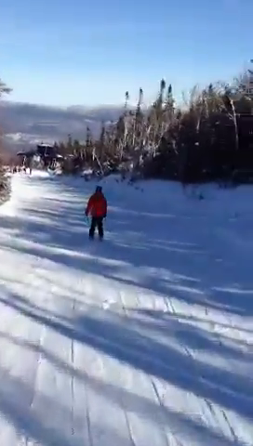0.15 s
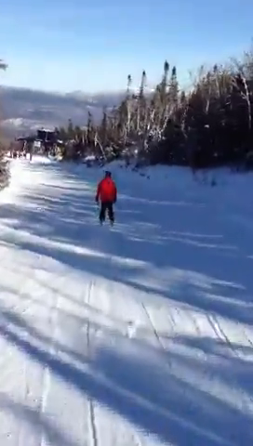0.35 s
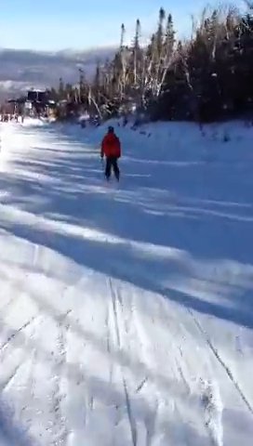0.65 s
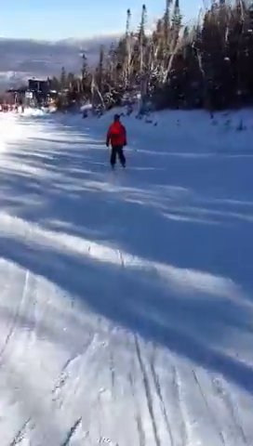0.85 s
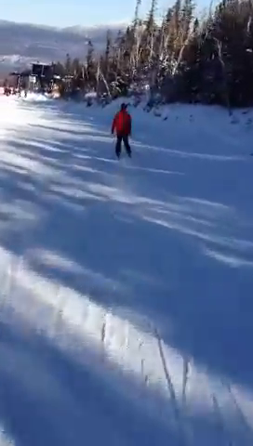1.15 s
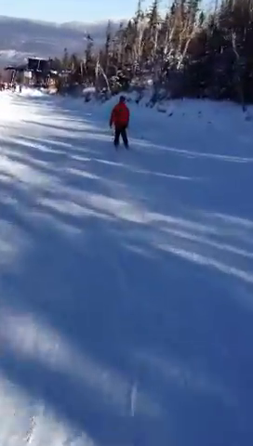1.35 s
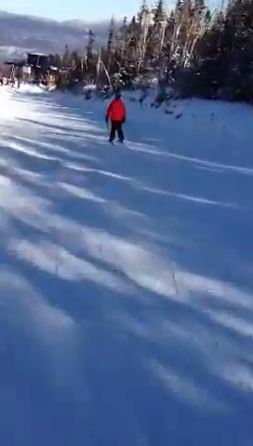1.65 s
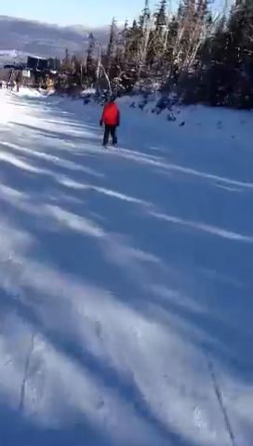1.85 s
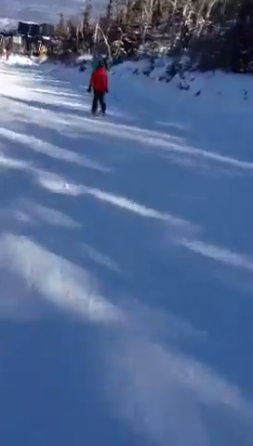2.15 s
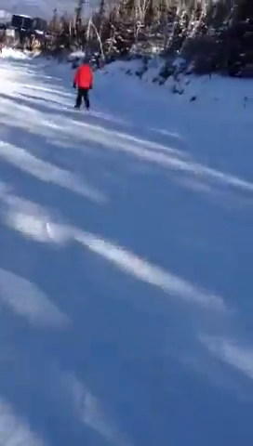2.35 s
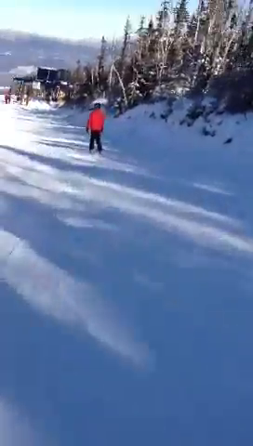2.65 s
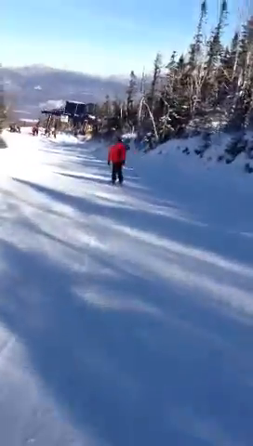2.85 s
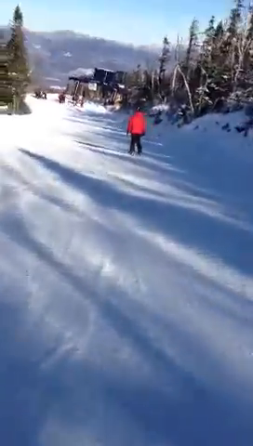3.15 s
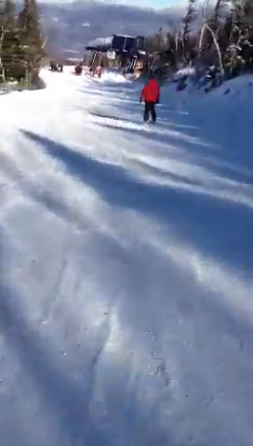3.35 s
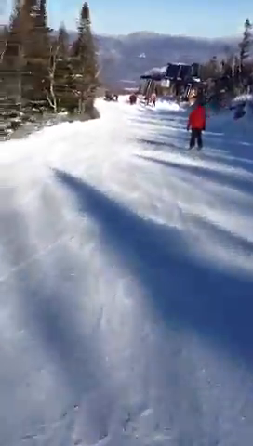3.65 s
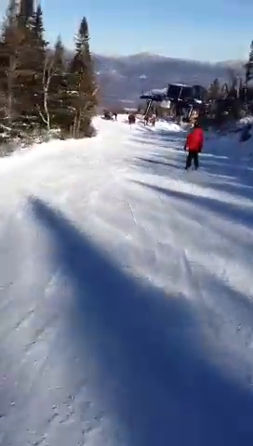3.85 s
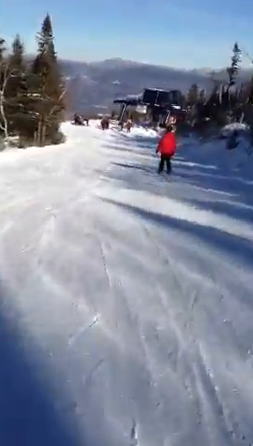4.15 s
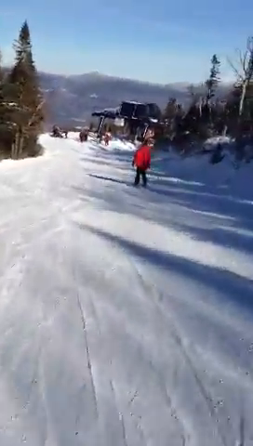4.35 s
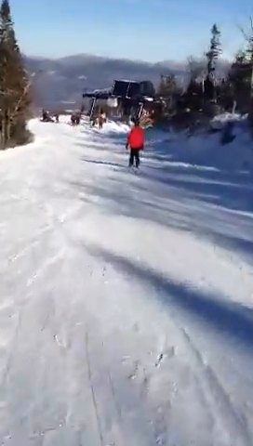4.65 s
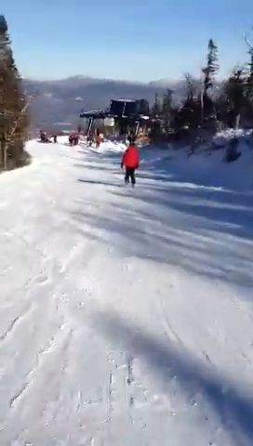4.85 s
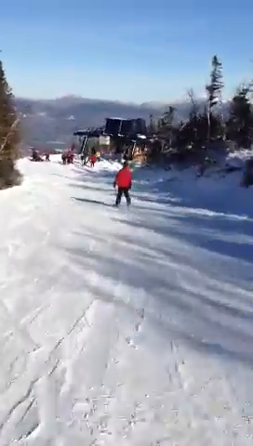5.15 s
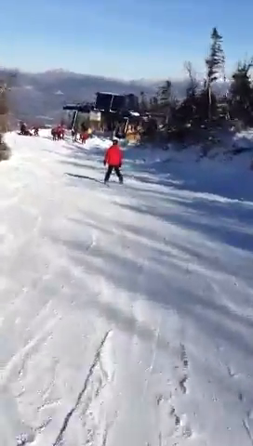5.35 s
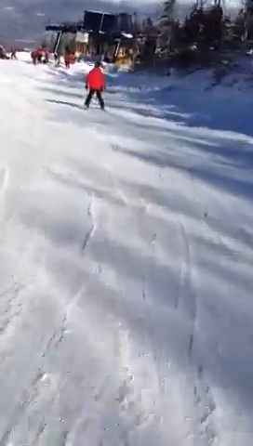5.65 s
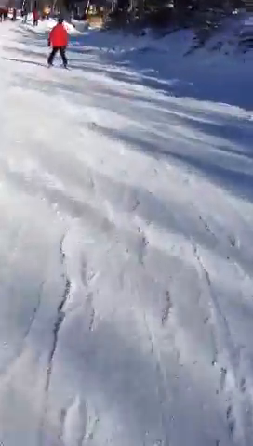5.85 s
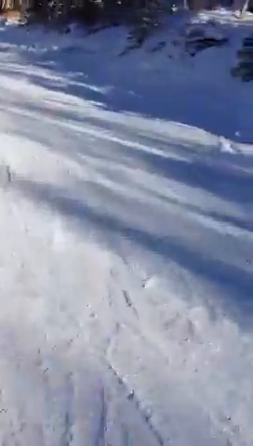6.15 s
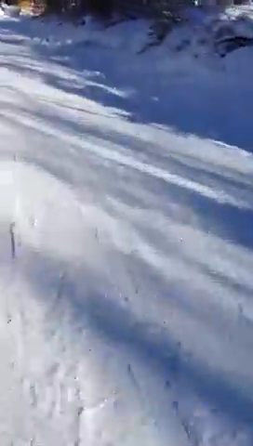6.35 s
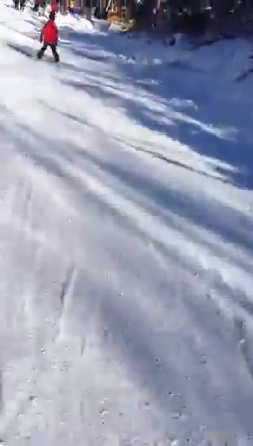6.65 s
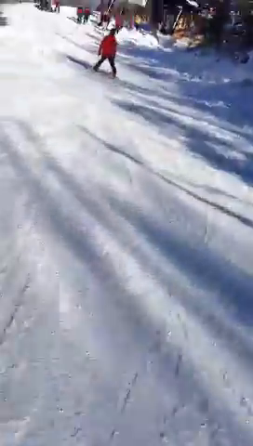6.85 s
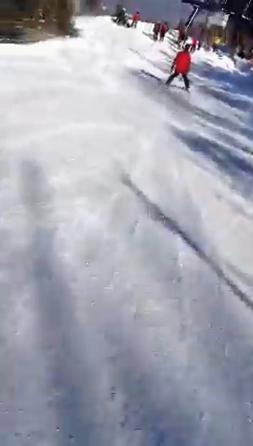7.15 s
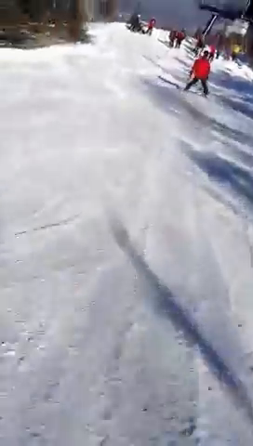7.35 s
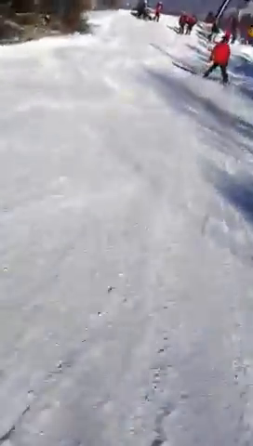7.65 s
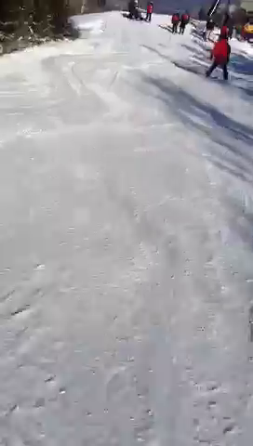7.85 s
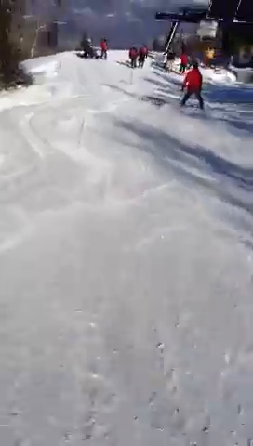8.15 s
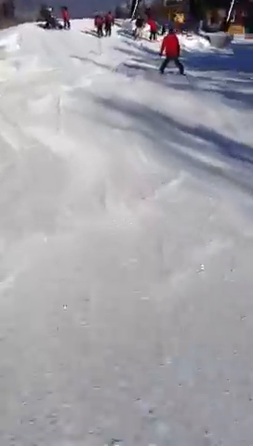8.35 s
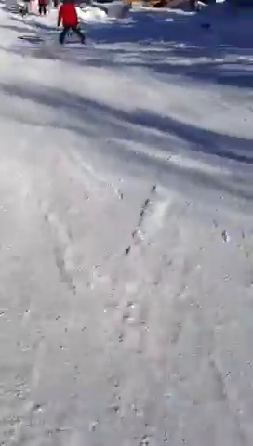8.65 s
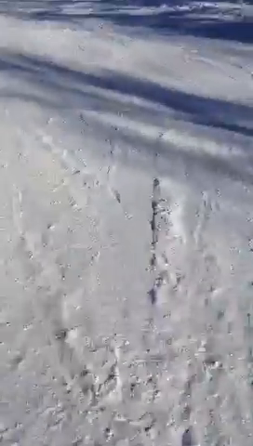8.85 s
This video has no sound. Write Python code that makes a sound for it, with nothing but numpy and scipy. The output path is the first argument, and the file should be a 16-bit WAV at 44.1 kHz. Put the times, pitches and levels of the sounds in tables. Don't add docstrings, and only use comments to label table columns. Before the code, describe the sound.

Lumpy low wind buffeting over a faint ski glide with small ticks and knocks, rising to harsh snow scrapes near the end.

```python
import sys
import numpy as np
from scipy import signal
from scipy.io import wavfile

SR = 44100
rng = np.random.default_rng(int(sys.argv[2]) if len(sys.argv) > 2 else 0)


def undo_db(level):
    steps = np.asarray(level, float) / 20
    return 10 ** steps


def waveform_to_disk(signal):
    frames = np.transpose(np.atleast_2d(signal))
    scaled = np.clip(frames, -1, 1) * 32767
    samples = np.round(scaled).astype(np.int16)
    wavfile.write(sys.argv[1], SR, samples)


N = 397341
CURVE_STEP = 40


def rms_one(x):
    return x / np.sqrt(np.mean(x ** 2) + 1e-20)


def drift(rate):
    r = np.exp(-40 * np.pi * rate / SR)
    noise = rng.standard_normal(N // 20 + 2002)
    slow = signal.lfilter([1], [1, -2 * r, r * r], noise)[2000:]
    return np.interp(np.arange(N) / 20, np.arange(len(slow)), rms_one(slow))


def bands(sources, spectrum, per_octave):
    hz_points, db_points = np.transpose(spectrum)
    octaves = np.log2(hz_points[-1] / hz_points[0])
    edges = hz_points[0] * 2 ** np.linspace(0, octaves, int(octaves * per_octave) + 1)
    for k, (low, high) in enumerate(zip(edges, edges[1:])):
        centre_hz = np.sqrt(low * high)
        band_filter = signal.butter(2, [low, high], "band", fs=SR, output="sos")
        band = signal.sosfilt(band_filter, sources[k % 2])
        yield centre_hz, band * undo_db(np.interp(np.log(centre_hz), np.log(hz_points), db_points))


def blend(layers):
    powers = [undo_db(2 * level_db) for level_db, _ in layers]
    total = sum(powers)
    colour_db = sum(p * colour for p, (_, colour) in zip(powers, layers)) / total
    points = np.arange(len(total))
    return [np.interp(np.arange(N) / CURVE_STEP, points, c) for c in (10 * np.log10(total), colour_db)]


def gusts():
    # time_s, level_db
    breeze = [(0, -30.5), (1.65, -30), (1.75, -23.5), (2.02, -26), (2.35, -25), (2.75, -28), (3.1, -30),
              (4.4, -31.5), (4.7, -33), (4.9, -30), (5.5, -30.5), (5.95, -31), (6.25, -29.5), (6.6, -30),
              (7.6, -28.5), (8.1, -34), (8.72, -31), (9.01, -31.5)]
    # start_s, length_s, level_db, brightness_db of the small eddies
    gust_list = [(0.0, 0.015, -18, -6.5), (0.214, 0.12, -21, -7.5), (0.318, 0.19, -15, -7),
                 (0.495, .07, -22, -6), (0.658, 0.065, -20, -7), (0.765, 0.16, -19, -8.5),
                 (1.038, 0.015, -15.5, -7.5), (1.098, 0.18, -17, -5), (1.319, 0.078, -18, -8.5),
                 (1.432, 0.12, -13.5, -9), (1.8, 0.063, -20, -6.5), (1.914, 0.048, -18.5, -3),
                 (2.115, 0.044, -25.5, -7), (2.456, 0.065, -22, -7), (2.607, .13, -28, -9),
                 (2.81, 0.13, -11.5, -9), (2.978, 0.034, -17, -7.5), (3.257, 0.17, -21, -6.5),
                 (3.516, 0.17, -22.5, -9.5), (4.103, 0.07, -14, -6.5), (4.211, 0.11, -21, -8),
                 (4.595, 0.054, -23.5, -8), (5.037, 0.031, -23, -11), (5.19, 0.19, -26.5, -8),
                 (6.705, .12, -21, -10.5), (6.856, 0.13, -17, -10), (7.247, 0.15, -22, -5.5),
                 (8.197, 0.055, -15, -22), (8.292, 0.14, -14, -9), (8.498, 0.12, -19.5, -5.5)]
    rise_db_per_s, fall_db_per_s = 900.0, 503
    t = np.arange(0, N, CURVE_STEP) / SR
    layers = [(np.interp(t, *np.transpose(breeze)), -5)]
    for start_s, length_s, level_db, bright_db in gust_list:
        before_s = np.clip(start_s - t, 0, .2)
        after_s = np.clip(t - start_s - length_s, 0, .2)
        layers.append((level_db - rise_db_per_s * before_s - fall_db_per_s * after_s, bright_db))
    return blend(layers)


def wind():
    # pitch_hz, level_db per Hz
    eddies = [(15, -63), (25, -69), (65, -38), (112, -3), (171, 5), (461, -5.5), (1000, -23.5),
              (1510, -36.5), (1700, -37.5), (2600, -66), (3380, -70), (5720, -120)]
    gust_db, bright_db = gusts()
    lumps = rms_one(drift(60.5) - drift(5.2) * 0.27)
    bursts = np.clip(drift(102.0), 0, 1.7)
    out = 0
    for hz, band in bands(rng.standard_normal((2, N)), eddies, 2):
        small = np.clip(np.log2(hz / 336.0), 0, 1.6)
        joined = np.clip(np.log2(hz / 60.0) / 2.08, 0, 1)
        flutter_db = joined * 2.82 * lumps + 1.66 * drift(19.5) + small * 4.72 * bursts
        lag_db = (1 - joined) * 0.44 * (gust_db + 25.5)
        out = out + band * undo_db(flutter_db - lag_db + small * 1.62 * (bright_db + 5.5))
    return undo_db(gust_db + 0.72) * rms_one(out)


def swings(events, cycles, trim_db):
    out = np.zeros(N)
    for s, peak_db, hz in events:
        turns = np.arange(int(5 * SR / hz)) / SR * hz
        swell = np.exp(-((turns - 2.03 * cycles) / cycles) ** 2)
        swing = swell * np.sin(2 * np.pi * turns + rng.uniform(0, 2 * np.pi))
        at = int(s * SR)
        out[at:at + len(turns)] += undo_db(peak_db + trim_db) * swing[:N - at]
    return out


def buffets():
    # time_s, peak_db, pitch_hz
    large = [(0.094, -9.5, 196), (0.21, -4, 166), (0.352, -5, 232), (0.406, 4.5, 280), (0.663, -3, 254),
             (0.768, -3, 485), (1.035, 3.5, 236), (1.184, 1, 250), (1.25, -3, 315), (1.435, -6, 182),
             (1.916, 2, 231), (2.14, -1, 200), (2.506, -1.5, 232), (2.701, -2.5, 260), (2.804, -19, 223),
             (2.973, 2, 233), (3.325, -2, 235), (3.646, -2, 257), (4.104, -6, 185), (4.18, 3, 424),
             (5.852, -11, 199), (5.994, -11, 180), (6.716, -3, 220), (6.797, 0, 221), (6.943, 1, 202),
             (8.239, -3, 224), (8.39, -2, 200), (8.515, 1.5, 234), (8.598, 2.5, 229), (8.925, -11, 160)]
    # time_s, peak_db, pitch_hz
    flicks = [(0.315, -3, 487), (0.353, -9, 503), (0.406, -2, 480), (0.476, -0.5, 460), (0.665, -5, 724),
              (0.771, 0, 530), (1.115, -7, 456), (1.182, -10, 530), (1.25, -4.5, 544), (1.344, -12, 487),
              (1.436, -2, 452), (1.88, -13, 546), (1.914, -9, 480), (2.057, -12.5, 673), (2.511, -6.5, 546),
              (2.935, 1.5, 510), (3.003, -17, 470), (3.28, -7.5, 546), (3.317, -23, 560), (3.34, -8.5, 594),
              (3.408, -8.5, 554), (3.534, -10.5, 426), (3.926, -13, 550), (4.102, -4, 473),
              (4.296, -3.5, 500), (4.603, -12, 567), (7.172, -5, 890), (7.454, -7, 818), (8.322, -7, 580),
              (8.374, -14, 550)]
    return swings(large, 0.78, trim_db=-5.5) + swings(flicks, 0.7, trim_db=-2.5)


def edge_load():
    # time_s, spray_db, coarseness_db of the chatter against the spray
    glide = [(0, -54, 3), (.2, -43, 4.5), (.45, -45, 4.5), (.75, -49, -3), (.92, -44.5, 0.5),
             (1.76, -44.5, 0.5), (2.2, -42.5, 5.5), (2.65, -45, 2), (2.95, -51.5, -1), (3.74, -42, 0.5),
             (4.04, -47.5, 3), (4.33, -42, 4), (4.6, -46, 4.5), (5.0, -46.5, 1.5), (5.35, -48, -4),
             (6.7, -43, -5.5), (8.2, -42.5, -4.5), (9.01, -41, -12)]
    # hardest_s, spray_db, dig_in_s, let_go_s, coarseness_db
    bites = [(0.0, -42.5, .01, 0.027, 4), (5.46, -42.5, .02, .1, -1.5), (5.62, -38, 0.098, 0.2, -8),
             (5.8, -37.5, 0.21, 0.088, 1.5), (5.93, -38, 0.032, 0.097, 1), (6.06, -39, 0.055, 0.21, 3),
             (6.18, -34.5, 0.039, 0.31, -1.5), (6.91, -31, 0.11, 0.07, 4.5), (7.05, -27, 0.088, 0.23, 3.5),
             (7.36, -25, 0.16, 0.27, 1), (7.62, -29.5, 0.24, 0.26, -1.5), (7.87, -39, 0.18, 0.064, 4),
             (8.45, -30, .08, 0.26, -1), (8.72, -35, 0.19, 0.093, -1), (9.01, -32, 0.18, .1, -4)]
    t = np.arange(0, N, CURVE_STEP) / SR
    times, *columns = np.transpose(glide)
    layers = [[np.interp(t, times, c) for c in columns]]
    for s, db, dig_s, release_s, coarse_db in bites:
        away = (t - s) / np.where(t < s, dig_s, release_s)
        layers.append((db - np.minimum(10 * away ** 2, 100), coarse_db))
    spray_db, coarse_db = blend(layers)
    return spray_db, spray_db + coarse_db


def grains(per_s, spread_db):
    sizes = undo_db(spread_db * np.minimum(rng.exponential(1, N), 5)) * rng.choice([-1, 1], N)
    return rms_one(sizes * (rng.random(N) < per_s / SR))


def resonance(x, hz, width_hz):
    r = np.exp(-np.pi * width_hz / SR)
    feedback = [1, -2 * r * np.cos(2 * np.pi * hz / SR), r * r]
    return signal.lfilter(np.array([1, 0, -1]) * (1 - r * r) / 2, feedback, x)


def ringing(modes, ridges, loose, crumbs_per_s):
    out = 0
    for hz, width_hz, db in modes:
        crumbs = loose * grains(crumbs_per_s * undo_db(2.2 * ridges), 4.0)
        rush = (0.39 + 0.69 * (1 - loose)) * rng.standard_normal(N)
        ring = rms_one(resonance(crumbs + rush, hz, width_hz))
        out = out + undo_db(db + 2.9 * loose * drift(14.0)) * ring
    return out


def skis():
    # pitch_hz, level_db per Hz
    spray_tone = [(1290, 0), (2200, -5.5), (2440, -5.5), (2950, -7.5), (3640, -3), (4530, -3.5), (4990, -6),
                  (5920, -2.5), (7930, -1.5), (10100, -8), (13100, -8.5), (14700, -13), (15300, -19)]
    # pitch_hz, level_db per Hz
    chatter_tone = [(290, -26), (500, 5), (807, 6.5), (1350, -1), (1640, -4.5), (2790, -8.5), (3600, -11),
                    (4680, -55), (7920, -120)]
    # pitch_hz, width_hz, level_db
    ski_body = [(1636, 110, -4), (2060, 76, -7.5), (2500, 210, -9.5)]
    # pitch_hz, width_hz, level_db
    edge_sing = [(3700, 510, -3.5), (4420, 380, -1.5)]
    # time_s, level_db against the broad scrape
    free_ring = [(0, -6.5), (5.3, -3.5), (5.7, -2), (6.1, -1.5), (6.6, 0.5), (6.9, -4), (9.01, -3)]
    spray_db, chatter_db = edge_load()
    ring_db = np.interp(np.arange(N) / SR, *np.transpose(free_ring))
    loose = np.clip((-22.0 - spray_db) / 12.0, .3, 1)
    ridges = loose * drift(45.0)

    fine = [rng.standard_normal(N) + 0.5 * grains(1200.0, 5.1) for _ in range(2)]
    spray = 0
    for hz, band in bands(fine, spray_tone, 7):
        airy = np.clip(np.log2(hz / 8200.0) / 0.41, 0, 1)
        load_db = (1 - .6 * airy) * 1.3 * ridges - airy * 0.96 * np.maximum(spray_db + 30.5, 0)
        spray = spray + band * undo_db(load_db + 1.4 * drift(9.4))
    spray = rms_one(spray) + undo_db(ring_db - 7.5) * ringing(edge_sing, ridges, loose, 400.0)

    coarse = [rng.standard_normal(N) + 0.28 * loose * grains(580.0, 1.14) for _ in range(2)]
    rattle = 0
    for _, band in bands(coarse, chatter_tone, 3):
        rattle = rattle + band * undo_db(2.0 * loose * drift(36.0))
    chatter = undo_db(2.1 * ridges) * rms_one(rattle)
    chatter = chatter + undo_db(ring_db) * ringing(ski_body, ridges, loose, 170.0)
    return undo_db(spray_db - 0.02) * spray + undo_db(chatter_db + 2.0) * rms_one(chatter)


def ticks(events, width_hz, length_ms, trim_db):
    out, t = np.zeros(N), np.arange(1800) / SR
    for s, peak_db, hz, edge_db in events:
        fade = np.exp(-t * 1000 / length_ms) * np.minimum(t / .0008, 1)
        crackle = rng.standard_normal(len(t)) * fade
        ring = resonance(resonance(crackle, hz, width_hz), hz, 1.76 * width_hz)
        wide = signal.butter(3, [.5 * hz, min(2.96 * hz, 9300)], "band", fs=SR, output="sos")
        edge = signal.sosfilt(wide, crackle)
        tick = ring / np.abs(ring).max() + undo_db(edge_db) * edge / np.abs(edge).max()
        at = int(s * SR)
        out[at:at + len(t)] += undo_db(peak_db + trim_db) * tick[:N - at]
    return out


def boot_knocks():
    # time_s, peak_db, pitch_hz, edge_db of the wide part against the peak
    knock_list = [
        (0.006, -9.5, 700, -17),
        (0.665, -10, 842, -17),
        (0.693, -17, 805, -14),
        (2.599, -16, 1100, 3),
        (3.928, -23, 930, -13),
        (3.933, -13, 970, -17),
        (5.052, -18, 802, -9),
        (5.076, -20, 872, -12),
    ]
    return ticks(knock_list, 330.0, 3.0, trim_db=-6.5)


def ice_ticks():
    crumb_hits = [(0.3996, -24, 1600, -1), (0.4224, -13.5, 1700, -20), (0.4773, -20, 1420, -2),
                  (0.6685, -20, 1300, -20), (1.1014, -30, 1330, 2), (1.186, -25, 1340, -15),
                  (1.374, -29, 1980, 5), (1.5397, -21, 1270, -11), (2.154, -24, 2030, 2),
                  (2.3186, -21.5, 1610, -15), (2.337, -24, 1700, -9), (2.596, -16, 2520, -5.5),
                  (2.8, -29, 1600, 3), (3.2432, -22.5, 1630, -9), (3.925, -22.5, 1260, -18),
                  (3.9826, -34, 2000, 7), (4.1814, -18, 1420, -11), (4.2193, -28, 1470, 3),
                  (4.925, -19.5, 1790, -10), (5.195, -16, 1380, -20), (0.008, -38, 1680, 8),
                  (5.885, -26, 2010, 5), (6.0586, -19.5, 2130, -1), (6.1644, -25, 2060, -9),
                  (6.2607, -15, 1510, -10), (6.4504, -33, 2060, 7), (6.498, -23, 1880, -14),
                  (6.986, -24, 2170, -5), (7.455, -7.5, 1800, -5), (8.097, -28, 2200, -3)]
    return ticks(crumb_hits, 390.0, 3.2, trim_db=-2.0)


def crust_cracks():
    # time_s, peak_db, pitch_hz, edge_db of the wide part against the peak
    cracks = [(0.1895, -20, 5780, -4), (2.596, -22, 2400, -8), (2.801, -34, 3490, -8),
              (7.174, -8, 3460, -12), (7.2864, -9, 7470, -10), (7.3218, -4.5, 5900, -6),
              (7.333, -4, 7740, -10), (7.3374, -9, 5900, -10), (7.342, -5, 7260, -10),
              (7.3624, -14, 7200, -10), (7.654, -8, 4360, -10), (7.7144, -9, 4370, -10),
              (7.7347, -9, 3970, -16), (7.863, -14, 4350, -10)]
    return ticks(cracks, 1060.0, 2.1, trim_db=-9.0)


def scene():
    air = wind() + buffets()
    hits = boot_knocks() + ice_ticks() + crust_cracks()
    return (air + skis() + hits)[None]


def band_limit(x):
    return signal.sosfilt(signal.butter(12, 15380, fs=SR, output="sos"), x)


def record(dry):
    ceiling = .75
    x = signal.sosfilt(signal.butter(2, 77, "high", fs=SR, output="sos"), dry)
    x = x / (1 + np.abs(x / ceiling) ** 6) ** (1 / 6)
    x = signal.sosfilt(signal.ellip(12, .5, 70, 15350, fs=SR, output="sos"), x)
    return band_limit(x)


dry = scene()
out = record(dry)
waveform_to_disk(out)
```